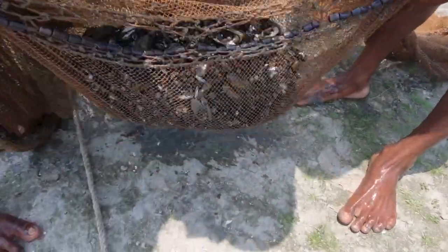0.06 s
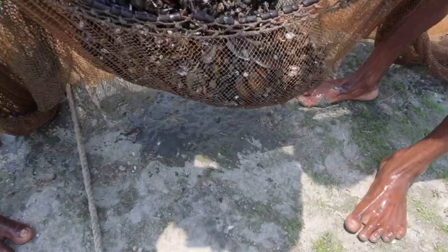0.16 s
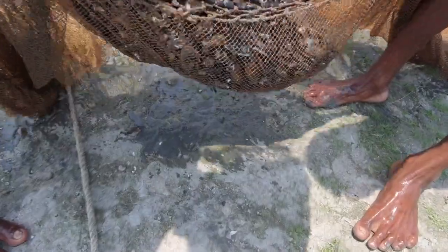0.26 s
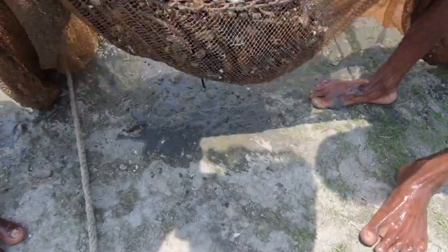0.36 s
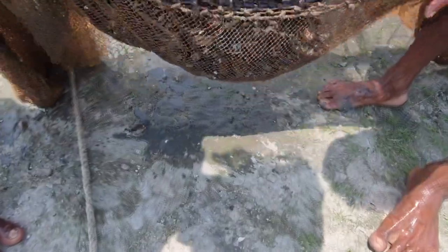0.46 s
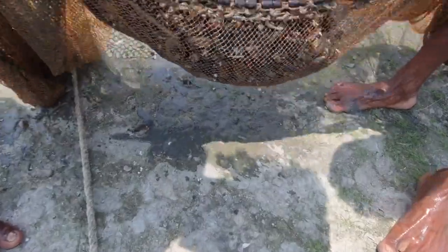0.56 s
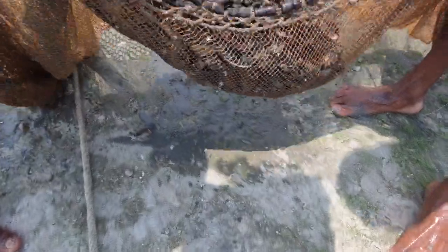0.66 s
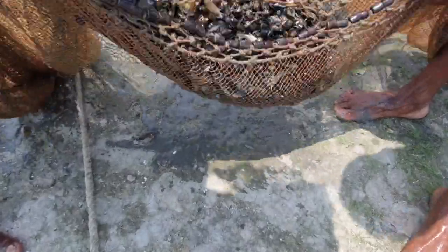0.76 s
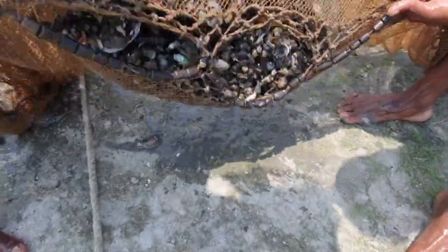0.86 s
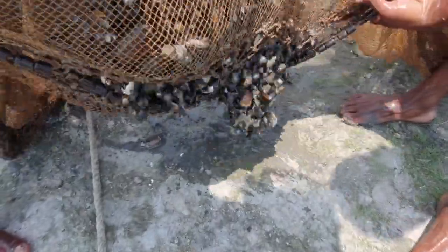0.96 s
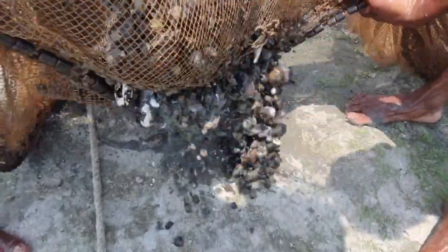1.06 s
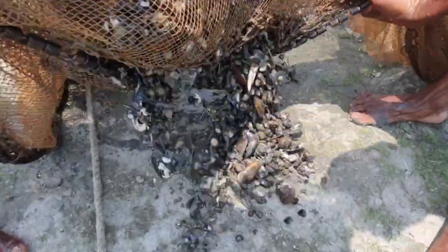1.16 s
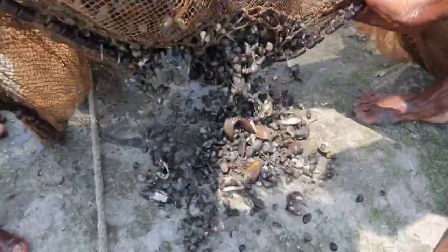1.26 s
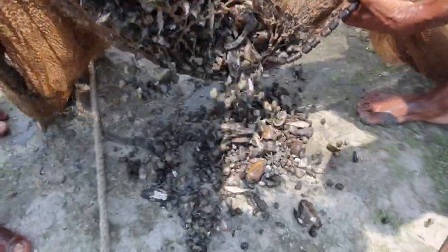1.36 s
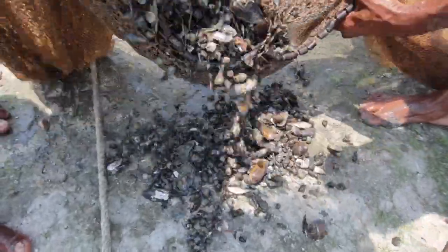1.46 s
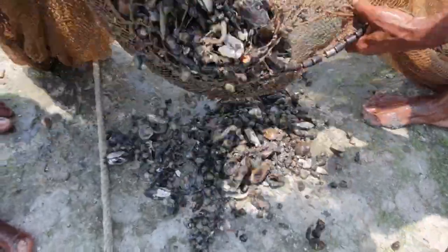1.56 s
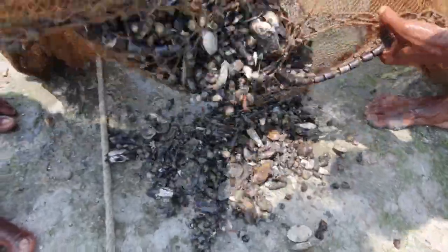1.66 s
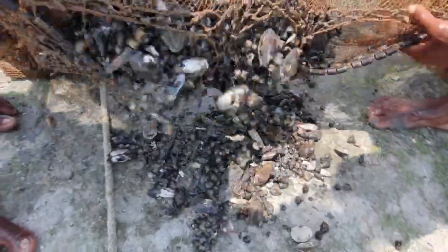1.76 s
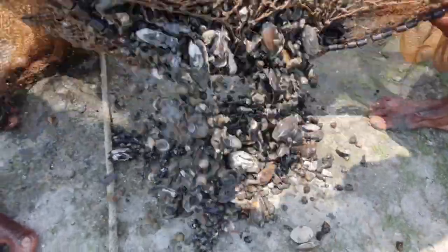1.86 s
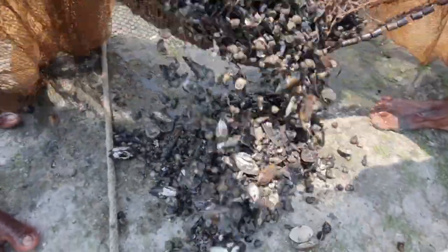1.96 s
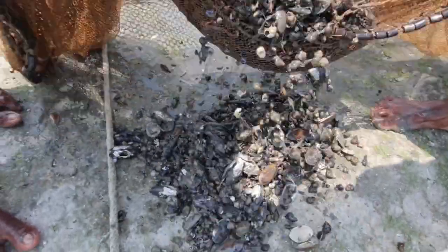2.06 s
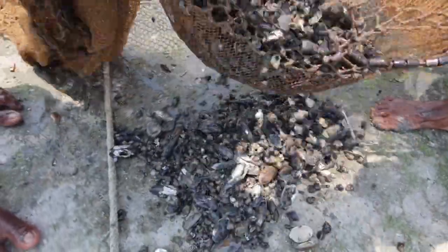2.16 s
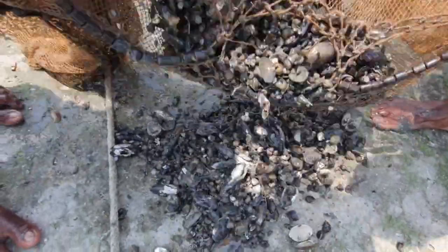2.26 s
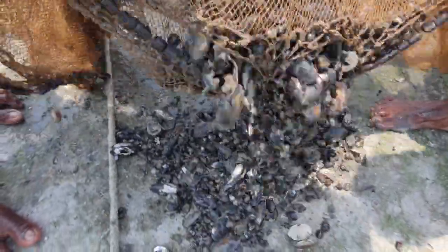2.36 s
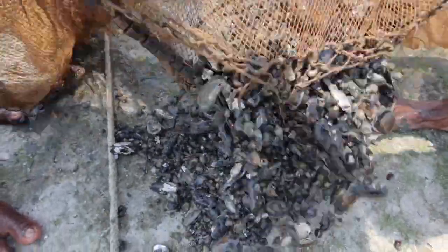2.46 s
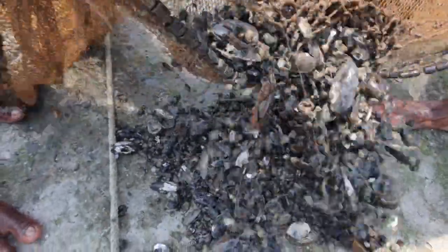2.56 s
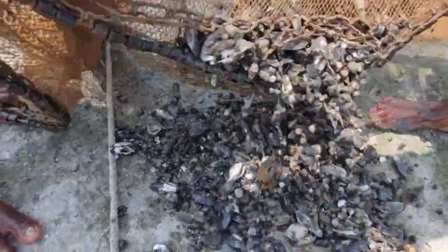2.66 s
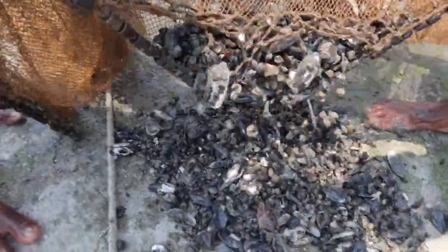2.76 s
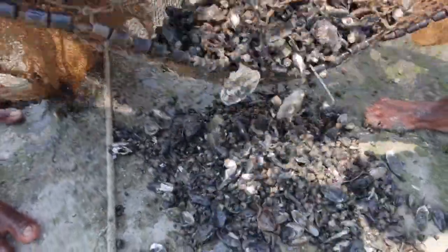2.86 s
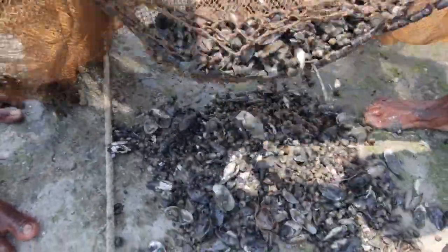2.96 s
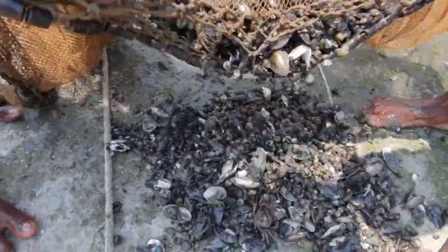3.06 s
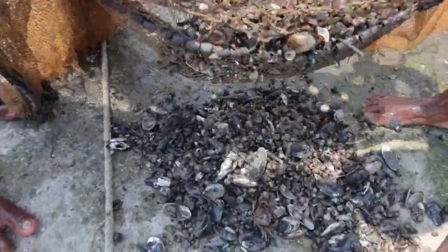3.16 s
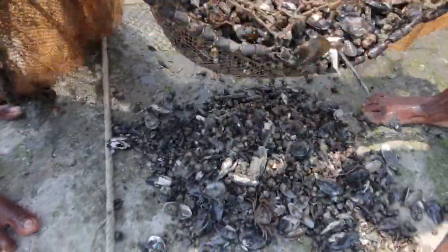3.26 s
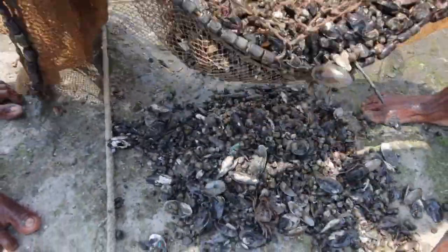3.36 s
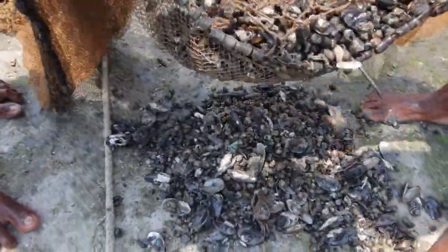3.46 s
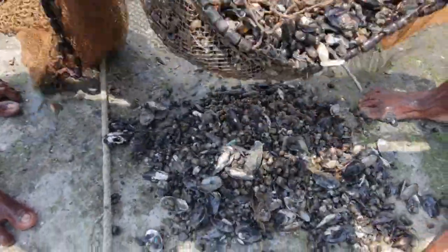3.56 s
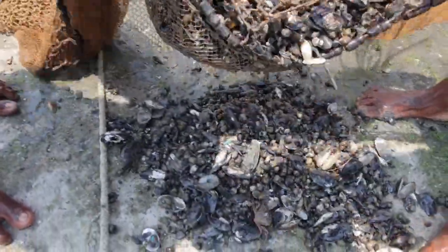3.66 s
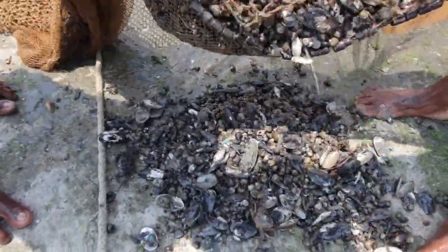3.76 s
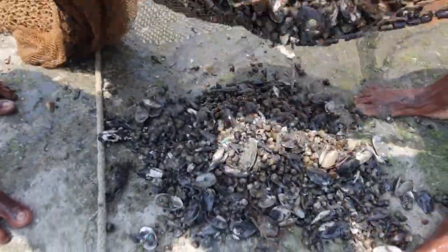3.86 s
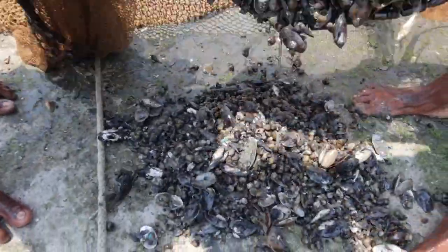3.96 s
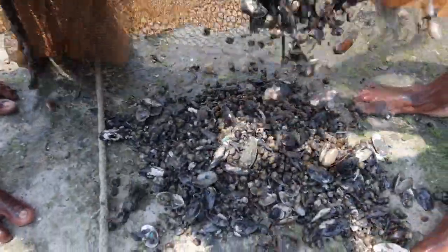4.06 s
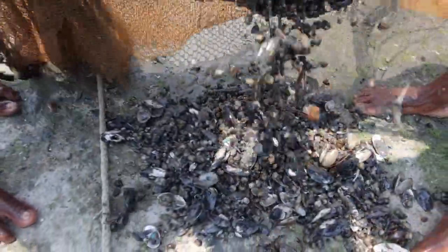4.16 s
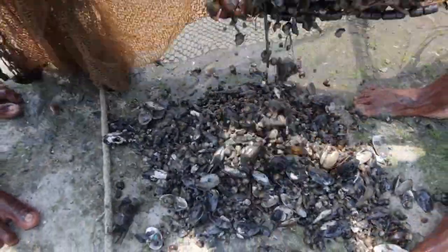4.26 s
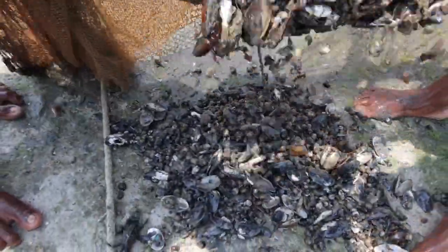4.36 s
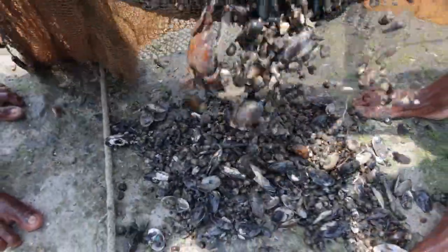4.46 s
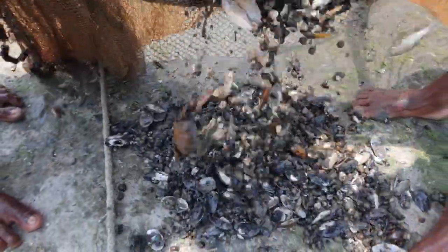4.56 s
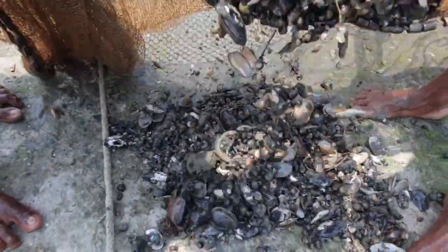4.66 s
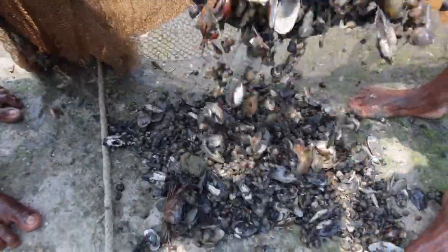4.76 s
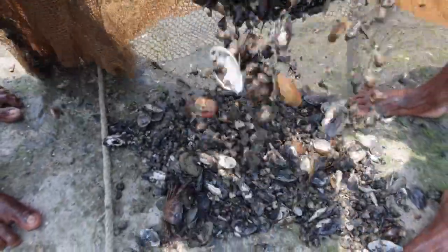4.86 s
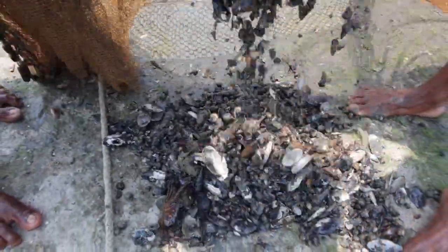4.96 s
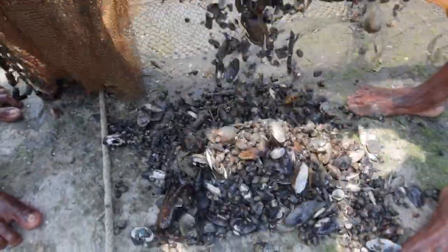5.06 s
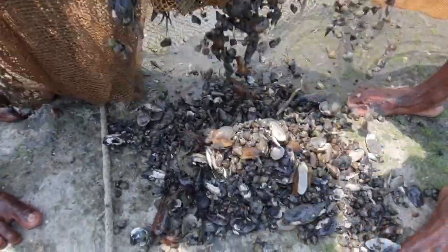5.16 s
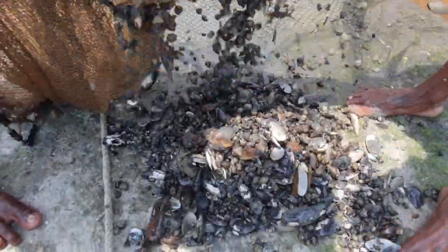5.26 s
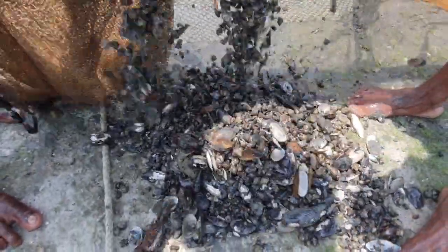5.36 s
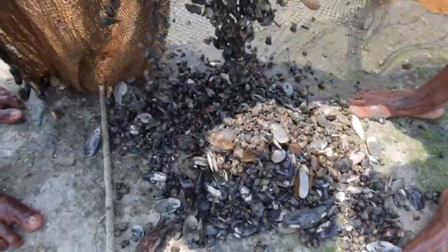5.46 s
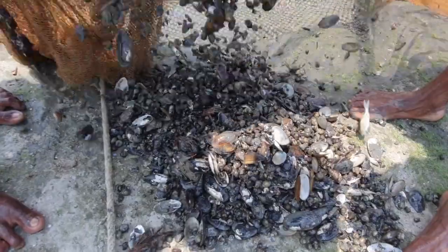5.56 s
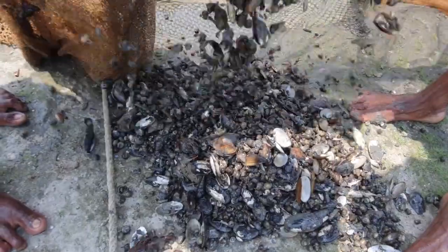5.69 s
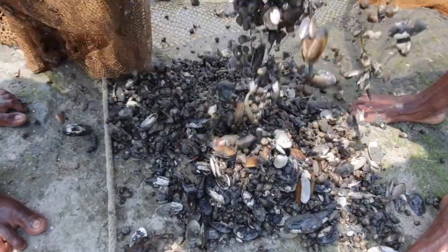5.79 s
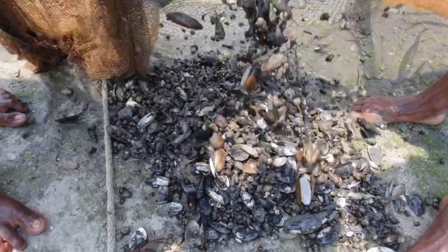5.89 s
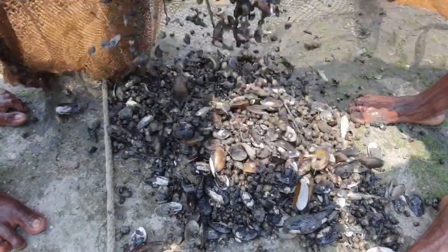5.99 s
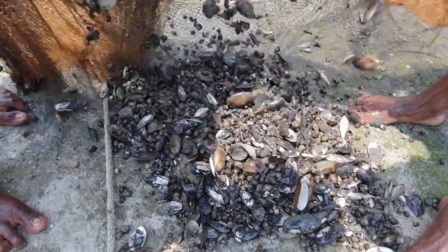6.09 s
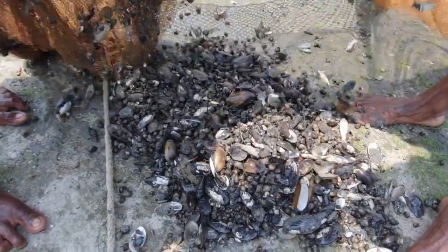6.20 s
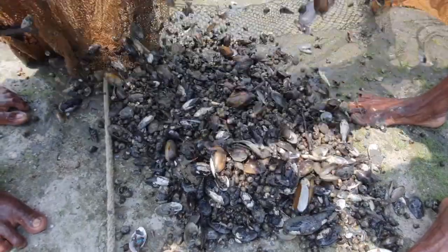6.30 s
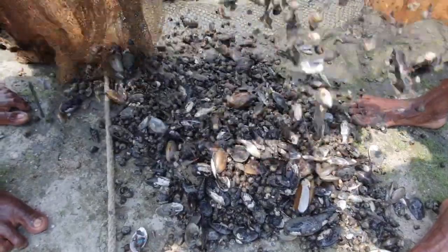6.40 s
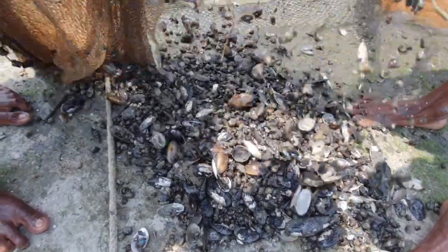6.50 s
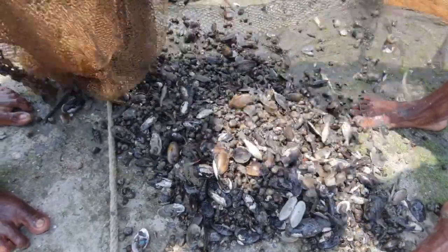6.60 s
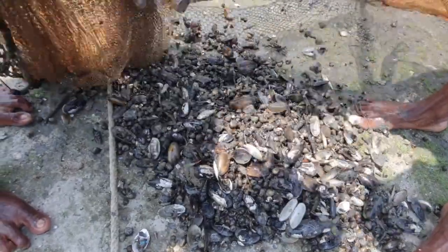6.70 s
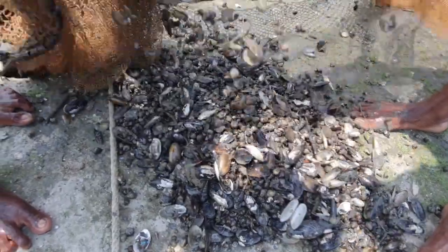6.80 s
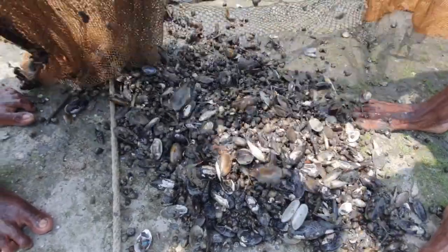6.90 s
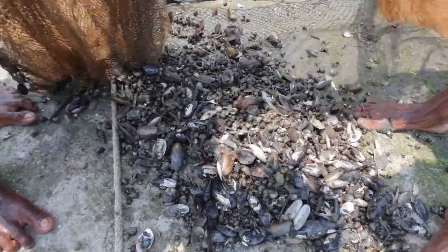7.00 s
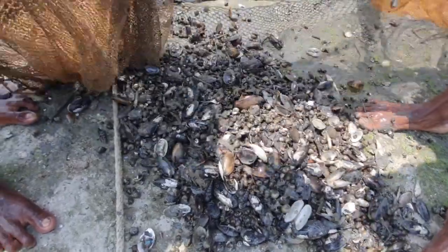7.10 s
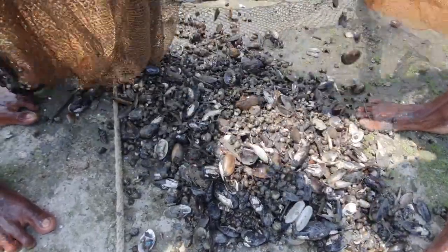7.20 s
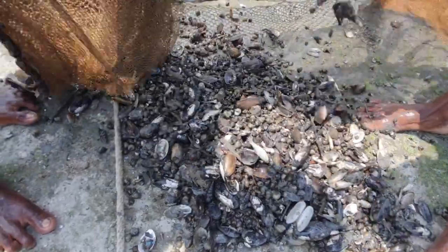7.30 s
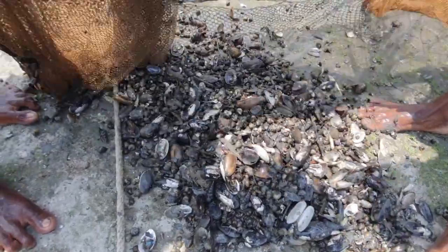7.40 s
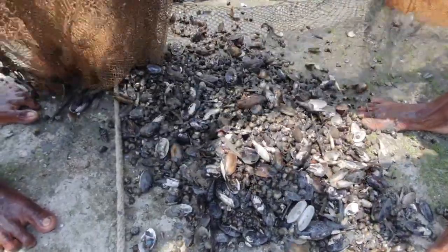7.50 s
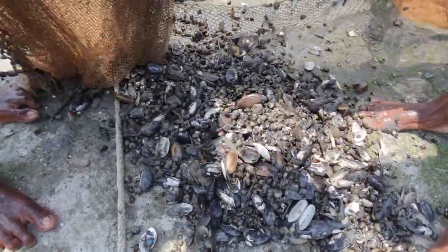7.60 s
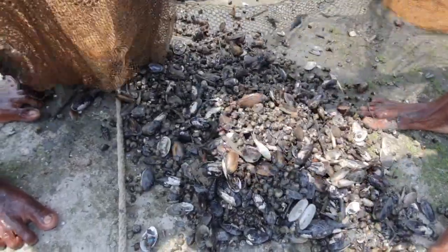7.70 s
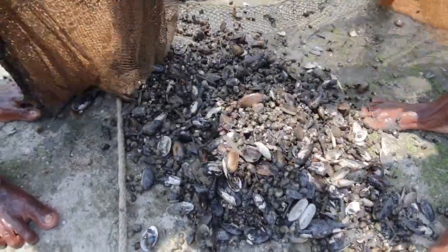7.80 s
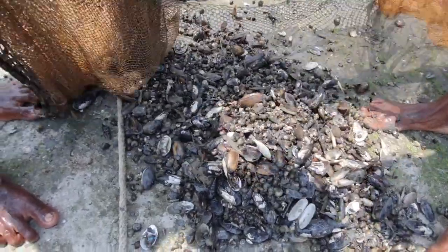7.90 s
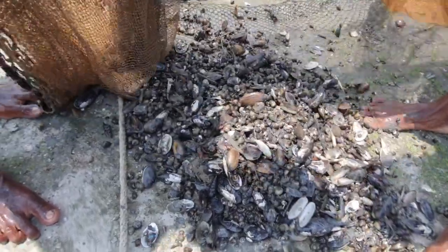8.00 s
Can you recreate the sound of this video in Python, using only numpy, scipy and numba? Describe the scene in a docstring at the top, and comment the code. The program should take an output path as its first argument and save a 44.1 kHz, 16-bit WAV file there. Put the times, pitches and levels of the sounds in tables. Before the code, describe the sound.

A wet net rustles, then heaps of small hard shells clatter down in waves and thin to scattered clicks in gusty open air.

```python
"""Wet snail and mussel shells pour out of a net onto a heap on hard ground, outdoors.
Thousands of small contacts, each a handful of short fading tones, merge into a rattle.
Single shells clack out of it with a crack, a ring, a hollow knock and a spray of small contacts.
Coloured noise makes the rustle of the nets and the wind that buffets two spaced microphone ports.
"""
import sys
import numpy as np
from scipy import signal
from scipy.fft import rfft, irfft, next_fast_len
from scipy.io import wavfile
from scipy.ndimage import uniform_filter1d, map_coordinates
from numba import njit

SR = 44100
rng = np.random.default_rng(int(sys.argv[2]) if len(sys.argv) > 2 else 0)


def dump_mix(stems):
    """Bounce the given channels to the path in sys.argv[1] as a 16-bit WAV at rate SR."""
    frames = np.atleast_2d(stems).T  # one column per channel
    limited = np.clip(frames, -1, 1)  # hard clip at full scale
    pcm = np.round(limited * 32767).astype(np.int16)
    wavfile.write(sys.argv[1], SR, pcm)


def attenuation_scalar(level_db):
    """Turn a level in dB into a linear amplitude multiplier (20 dB per decade)."""
    decades = np.asarray(level_db, float) / 20
    return 10 ** decades


N = 354563

# The breeze. Each row: time in seconds, rumble and flutter, both in dB before the wind's own gain.
BREEZE = [(0, -37.5, -41), (.4, -36, -40), (.68, -43, -47.5), (.85, -36, -40.5), (1.21, -43, -40.5),
          (1.72, -30, -35.5), (2.13, -37.5, -37), (2.64, -33, -36.5), (3.25, -38.5, -40), (3.4, -24, -30.5),
          (3.6, -29, -35.5), (3.85, -31.5, -36.5), (4.1, -31.5, -34.5), (4.35, -34, -23.5),
          (4.62, -37, -41), (4.8, -28, -29.5), (5.0, -42, -40), (5.28, -29.5, -41.5), (5.75, -30.5, -42.5),
          (6.1, -35, -44.5), (6.54, -44, -56.5), (6.9, -34, -44.5), (7.3, -42, -59), (7.7, -29.5, -38.5),
          (8.04, -30.5, -48.5)]
# Sudden puffs of wind. Each row: peak time in seconds, rumble and flutter in dB before the wind's own gain,
# left minus right in dB.
WIND_PUFFS = [(.22, -32, -53.5, 5), (.51, -31, -54, -8), (.78, -30.5, -46, -1), (1.07, -22.5, -27.5, -2),
              (2.73, -27.5, -45, -1), (2.82, -29, -52, -2), (3.02, -26.5, -39, -2), (3.15, -31, -29, 8),
              (3.312, -33, -28.5, -3), (3.43, -36, -29, -5), (3.558, -38, -20, 1.5), (4.25, -20, -18, -5),
              (4.392, -21.5, -21, -1.5), (4.51, -22.5, -32.5, -1), (4.76, -28, -26.5, 0),
              (4.82, -32, -28, 0), (4.877, -29, -23, -4), (5.04, -29, -33.5, 4), (5.168, -26.5, -27, -2),
              (5.71, -26.5, -35, -6), (6.93, -27, -30, -2), (6.97, -28, -32.5, -1), (7.08, -24.5, -45, -1),
              (7.21, -35, -48, 1), (7.32, -26.5, -44.5, 1), (7.46, -28.5, -40.5, 0), (7.66, -31, -47, -10)]
# Colour of the wind's low rumble. Each row: frequency in Hz, relative level in dB.
RUMBLE_COLOUR = [(15, -31), (30, -16), (55, -1.5), (90, 2), (130, -2.5), (200, -10.5), (400, -52)]
# Colour of the wind's flutter. Each row: frequency in Hz, relative level in dB.
FLUTTER_COLOUR = [(100, -31), (200, -3.5), (330, 2), (480, -7), (700, -14), (1200, -25.5), (2500, -55)]
# Wet nets rustle, most while the load is lifted and tipped. Each row: time in seconds, level in dB.
RUSTLE_LEVEL = [(0, -41), (.2, -33.5), (.38, -25.5), (.45, -29), (.55, -45.5), (.74, -55), (.9, -31.5),
                (1.1, -25.5), (1.6, -57), (8.04, -65)]
# Colour of the rustle. Each row: frequency in Hz, relative level in dB.
NET_COLOUR = [(410, -23), (700, -1), (1050, 2.5), (1850, -0.5), (2110, 1), (2370, 3), (3730, 3.5),
              (15500, -10.5)]
# Flow of shells out of the net. Each row: time in seconds, level in dB.
SHELL_FLOW = [(0, -47), (.4, -30), (.51, -41), (.74, -50), (.8, -42), (.955, -23), (1.09, -22), (1.15, -17),
              (1.28, -19), (1.33, -24), (1.44, -26), (1.53, -30), (1.63, -32), (1.7, -26), (1.76, -29),
              (1.81, -23), (1.88, -25), (2.02, -19), (2.23, -25), (2.3, -19), (2.445, -25), (2.64, -21),
              (2.71, -16), (2.86, -29), (3.0, -31), (3.16, -40), (3.2, -35.5), (3.235, -27), (3.27, -34.5),
              (3.3, -39), (3.63, -44), (3.675, -36), (3.72, -54), (3.82, -48), (3.92, -39), (3.955, -44),
              (3.99, -39), (4.05, -29), (4.18, -30), (4.235, -25), (4.265, -33), (4.31, -20), (4.37, -19),
              (4.42, -24), (4.455, -31), (4.6, -24), (4.65, -19), (4.73, -25), (4.81, -23), (4.87, -30),
              (5.04, -19), (5.26, -24), (5.545, -17), (5.7, -22), (6.02, -18), (6.07, -22), (6.19, -21),
              (6.23, -24.5), (6.34, -31), (6.4, -24), (6.57, -35), (6.62, -24), (6.86, -30), (7.01, -28),
              (7.07, -37), (7.27, -41.5), (7.46, -38), (7.5, -31), (7.68, -46), (7.73, -30), (7.89, -41),
              (8, -33), (8.04, -45)]
# Mussels among the snails. Each row: time in seconds, level over the snail flow in dB.
MUSSEL_SHARE = [(0, -7), (.4, -9), (.74, -6), (1.15, -14), (1.5, -10), (1.8, -6), (2.3, -7), (2.9, -11),
                (3.24, -13.5), (3.5, -4.5), (3.9, -5), (4.3, -10), (4.75, -14), (5.04, -10), (5.7, -8),
                (6.5, -12), (7.3, -14), (7.65, -6.5), (8.04, -11)]
# Colour of small shells. Each row: frequency in Hz, relative level in dB.
SNAIL_COLOUR = [(880, -25), (1500, -12), (1670, -11.5), (1850, -11.5), (3280, -5), (4330, -1), (4970, -5.5),
                (9010, -10.5), (10700, -13), (13200, -7), (14200, -9.5), (16000, -1.5)]
# Colour of big shells. Each row: frequency in Hz, relative level in dB.
MUSSEL_COLOUR = [(300, -48), (600, -8.5), (800, -2), (1100, -1.5), (1500, 0), (2100, 0.5), (3000, -2),
                 (5000, -52.5)]
# Shells that stand out. Each row: landing time in seconds, relative crack strength in dB, main ring in Hz,
# relative strength of the hollow knock in dB, time scale of the spray in seconds (limited later).
LOUD_SHELLS = [(0.2648, -14, 3680, -42, 0.05), (0.761, -27.5, 3980, -55, 0.038),
               (.895, -26, 4980, -38, 0.039), (1.111, -7, 8050, -39, 0.027),
               (1.151, -6.5, 5600, -33, 0.044), (1.19, -16, 4200, -35, 0.024),
               (1.233, -6, 4040, -28, 0.042), (1.492, -9.5, 3680, -41, 0.034),
               (1.5485, -10, 7450, -28, 0.053), (1.556, -11.5, 4430, -17.5, 0.04),
               (1.6055, -10, 5140, -41, 0.032), (1.645, -23, 4630, -47, 0.038),
               (1.661, -16, 4730, -36, 0.034), (1.81, -32, 1860, -21, 0.033),
               (1.933, -7.5, 4370, -42, 0.029), (1.983, -26, 3800, -46, 0.03), (1.992, -10, 4000, -35, .02),
               (2.004, -13, 4170, -32, 0.037), (2.013, -13, 4500, -32, .03), (2.032, -17, 4100, -28, 0.024),
               (2.082, -27, 1190, -22, 0.028), (2.109, -12, 3450, -15.5, 0.039),
               (2.131, -12, 2500, -29, .03), (2.265, -17, 2600, -10.5, 0.028),
               (2.6643, -9, 1820, -31, 0.13), (2.807, -14, 4750, -40, .025),
               (2.826, -17.5, 4640, -50, 0.082), (2.892, -24, 990, -18.5, 0.058),
               (2.92, -12.5, 3650, -25, 0.022), (3.011, -15.5, 3640, -26.5, 0.068),
               (3.0554, -12, 4000, -18, 0.031), (3.1237, -25, 4070, -19, 0.038),
               (3.132, -13, 4160, -24, 0.047), (3.163, -28, 9000, -50, 0.015),
               (3.279, -20.5, 3230, -27, 0.08), (3.319, -13.5, 6000, -41, 0.027),
               (3.36, -22, 7110, -50, 0.06), (3.381, -23, 4540, -50, 0.026), (3.492, -20, 7800, -50, 0.06),
               (3.532, -23, 4060, -50, 0.05), (3.551, -25, 5000, -50, .04),
               (3.5663, -22.5, 5300, -53, 0.011), (3.609, -18, 3900, -49, 0.029),
               (3.6453, -31, 4670, -55, 0.069), (3.665, -29.5, 5600, -55, 0.12),
               (3.762, -29, 5200, -57, .02), (3.856, -32, 4650, -30, 0.092), (3.918, -37, 3000, -36, .05),
               (4.021, -28, 1690, -24, .04), (4.1455, -15, 3750, -37, 0.024), (4.273, -15, 4000, -45, .03),
               (4.306, -4, 2750, -35, 0.025), (4.3203, -12, 6480, -50, 0.095),
               (4.369, -9.5, 2620, -38, 0.027), (4.393, -10, 4600, -50, 0.017),
               (4.4923, -12.5, 3380, -48, 0.037), (4.522, -11, 2700, -35, 0.027),
               (4.553, -23, 5470, -22, 0.072), (4.633, -4.5, 2560, -36, 0.065),
               (4.67, -6, 7440, -44, 0.013), (4.6984, -6.5, 7440, -36, 0.063), (4.753, -8, 3920, -40, 0.1),
               (4.794, -9.5, 2420, -34, 0.046), (4.823, -9.5, 3540, -50, 0.037),
               (4.8928, -14, 7700, -32, 0.062), (4.9252, -8, 7760, -43, 0.053),
               (4.948, -17, 4970, -44, 0.052), (5.021, -11.5, 1330, -27, 0.044),
               (5.0495, -5.5, 5380, -22, 0.12), (5.155, -17, 740, -14, 0.026),
               (5.275, -16, 2460, -36, 0.044), (5.351, -11, 4500, -40, 0.02),
               (5.385, -15, 4000, -40, 0.049), (5.43, -12, 8500, -40, .03), (5.4485, -11, 5200, -42, .03),
               (5.471, -8, 3770, -37, 0.041), (5.491, -16, 4200, -35, 0.024),
               (5.533, -15, 9150, -50, 0.027), (5.549, -23, 4000, -38, 0.026),
               (5.576, -26, 1480, -36, 0.028), (5.628, -26, 5470, -38, 0.026),
               (5.658, -13, 1980, -43, 0.013), (5.774, -17, 1100, -24, 0.034),
               (5.81, -17, 2720, -42, 0.028), (5.8587, -13, 4820, -35, 0.035),
               (5.882, -14, 1420, -23, 0.027), (5.971, -22, 1420, -24, 0.034),
               (6.0332, -4, 3660, -44, 0.046), (6.174, -8, 2320, -25, 0.021),
               (6.225, -9.5, 3710, -40, 0.03), (6.3514, -8.5, 4500, -50, 0.045),
               (6.37, -14, 2110, -49, 0.032), (6.385, -13, 1540, -46, 0.1), (6.4163, -14, 3700, -52, 0.083),
               (6.434, -5, 3830, -49, 0.026), (6.486, -13, 3380, -49, 0.13),
               (6.532, -8.5, 5870, -19, 0.042), (6.592, -7.5, 2720, -19, 0.092),
               (6.691, -12, 4700, -22.5, 0.031), (6.764, -15, 5070, -40, 0.063),
               (6.776, -14, 2010, -26, 0.024), (6.849, -20, 6870, -52, 0.028),
               (6.8956, -10, 1540, -27, 0.034), (6.97, -17, 1820, -23, 0.032),
               (7.0037, -9, 4500, -32, 0.063), (7.02, -22, 3960, -23.5, 0.046),
               (7.05, -18, 3820, -49, 0.043), (7.104, -26, 3830, -48, .05), (7.123, -19, 4200, -48, 0.033),
               (7.153, -22, 3360, -44, 0.12), (7.185, -16.5, 3300, -55, 0.14),
               (7.211, -27, 3320, -50, 0.053), (7.2813, -13.5, 2540, -46, 0.085),
               (7.2912, -22.5, 1470, -37, 0.028), (7.3207, -13, 7150, -43, 0.037),
               (7.362, -18, 3250, -54, 0.053), (7.394, -19, 3240, -55, 0.07),
               (7.418, -26, 3500, -50, 0.069), (7.46, -33, 4500, -50, 0.023),
               (7.484, -10, 5000, -29, 0.038), (7.488, -24, 4000, -35, .03),
               (7.498, -3.5, 3570, -19, 0.044), (7.509, -30, 3500, -43, 0.058),
               (7.5424, -24, 9100, -54, 0.11), (7.566, -21, 4030, -53, 0.034),
               (7.61, -19, 2970, -45, 0.056), (7.619, -21, 4150, -42, 0.02), (7.637, -17, 2530, -34, 0.041),
               (7.701, -12.5, 7900, -39, 0.047), (7.7257, -12.5, 1960, -22, 0.077),
               (7.7793, -17, 3400, -50, 0.053), (7.793, -11, 3800, -49, 0.025),
               (7.831, -15.5, 4700, -27, 0.038), (7.8502, -15, 7240, -24, 0.058),
               (7.911, -21.5, 7400, -50, 0.058), (7.938, -19.5, 6070, -43, 0.044),
               (7.954, -11.5, 9300, -43, 0.031), (7.973, -23, 5030, -51.5, .03),
               (7.996, -19, 2480, -35.5, 0.034), (8.019, -15, 2620, -54, 0.022)]
# Shells are too small to radiate bass. Each row: frequency in Hz, relative level in dB.
HOLLOW_COLOUR = [(150, -40), (500, -14), (900, 0), (16000, 0)]
# Echoes off heap, net and legs. Each row: frequency in Hz, time to fade by 60 dB in seconds.
ECHO_FADE = [(500, 0.019), (3000, 0.15), (12000, 0.0054)]

# A mode is one of the tones a shell rings with; t60 is the time a sound takes to fade by 60 dB.
RISE = .2  # a mode swells in over this share of its decay time


def unit(x):
    """Scale x to an rms of 1."""
    return x / np.sqrt(np.mean(x ** 2) + 1e-20)


def along(points, hz):
    """Read a curve of (Hz, value) points on a logarithmic frequency axis."""
    f, v = np.transpose(points)
    return np.interp(np.log(hz + 1), np.log(f + 1), v)


def curves(rows):
    """Give one value per sample for each column after the time."""
    s, *cols = np.transpose(rows)
    return [np.interp(np.arange(N) / SR, s, c) for c in cols]


def wobble(rate):
    """Draw a smooth random curve through rate random points a second."""
    return map_coordinates(rng.standard_normal(N // 200), [np.arange(N) * rate / SR])


def coloured(x, spectrum):
    """Colour x with a spectrum; the minimum-phase filter never sounds ahead of its input."""
    m = 2 * next_fast_len(N // 2 + SR // 4)
    log_gain = np.log(attenuation_scalar(along(spectrum, np.fft.rfftfreq(m, 1 / SR))))
    # Folding the cepstrum forward in time makes the filter causal.
    cepstrum = irfft(log_gain, m)
    cepstrum[1:m // 2] *= 2
    cepstrum[m // 2 + 1:] = 0
    return irfft(rfft(x, m) * np.exp(rfft(cepstrum)), m)[..., :N]


def wind():
    """Eddies burst on each port mostly by themselves, so left and right differ; the small ones pop."""
    rise_db_per_s, fall_db_per_s = 266, 197
    rumble_gain, flutter_gain = (attenuation_scalar(db) * np.ones((2, 1)) for db in curves(BREEZE))
    for s, rumble_db, flutter_db, pan_db in WIND_PUFFS:
        near = slice(max(round((s - .2) * SR), 0), round((s + .2) * SR))
        t = np.arange(N)[near] / SR - s
        shape_db = np.where(t < 0, rise_db_per_s * t, -fall_db_per_s * t)
        shape = attenuation_scalar(shape_db + [[pan_db / 2], [-pan_db / 2]])
        # A puff adds its power to the breeze.
        rumble_gain[:, near] = np.hypot(rumble_gain[:, near], attenuation_scalar(rumble_db) * shape)
        flutter_gain[:, near] = np.hypot(flutter_gain[:, near], attenuation_scalar(flutter_db) * shape)
    lumps = np.array([wobble(22), wobble(22)]) + 0.4 * wobble(14)  # the last part is shared by both ports
    pops = np.array([wobble(90), wobble(90)])
    rumble_noise = attenuation_scalar(2.86 * lumps) * rng.standard_normal((2, N))
    flutter_noise = attenuation_scalar(2.8 * lumps + 4.6 * pops) * rng.standard_normal((2, N))
    rumble = unit(coloured(rumble_noise, RUMBLE_COLOUR))
    flutter = unit(coloured(flutter_noise, FLUTTER_COLOUR))
    return attenuation_scalar(1.5) * (rumble_gain * rumble + flutter_gain * flutter)


def net_rustle():
    """Wet nets rub: coloured noise, partly common to both ports, whose level trembles."""
    level_db = curves(RUSTLE_LEVEL)[0] + 1.6 * wobble(65.5)
    noise = rng.standard_normal(N) + rng.standard_normal((2, N))
    return attenuation_scalar(level_db) * unit(coloured(noise, NET_COLOUR))


@njit
def add(out, start, hz, t60, gain, lag, pan):
    """Add fading sines; each reaches the right port lag seconds after the left, pan times weaker."""
    for i in range(len(start)):
        for side in range(2):
            at = (start[i] + lag[i] * (side - .5)) * SR
            first = max(int(np.floor(at)) + 1, 0)
            # Each turn of this complex number gives the next sample of the fading sine.
            pole = -np.log(1000) / t60[i] / SR + 2j * np.pi * hz[i] / SR
            step = np.exp(pole)
            z = gain[i] * pan[i] ** (.5 - side) * np.exp(pole * (first - at))
            for n in range(first, min(first + int(.6 * t60[i] * SR), out.shape[1])):
                out[side, n] += z.imag
                z *= step


def contacts(start, gain, lo_hz, hi_hz, cycles, longest, lag, pan_db, count, bunch=1, snap_db=-3):
    """Each contact rings count modes of its own shell, in a share (bunch) of the range, after a dry snap."""
    u = rng.random((len(start), 5, count))
    hz = lo_hz + (hi_hz - lo_hz) * ((rng.random((len(start), 1)) + bunch * u[:, 0]) % 1)
    # The basic t60 is a number of cycles, with a limit; a few modes then linger up to 15 dB (5.6 times) longer.
    t60 = np.minimum(cycles / hz, longest) * attenuation_scalar(15 * u[:, 1] ** 2)
    size = gain[:, None] * attenuation_scalar(2 * u[:, 2]) / np.sqrt(t60 * count)
    pan = attenuation_scalar(pan_db[:, None] + 16 * (u[:, 3] - .5))  # every mode beams a little to one side
    # A ribbed shell touches down at several points, not at once.
    onset = start[:, None] + .0022 * u[:, 4] ** 2
    lags = np.repeat(lag, count)
    out = np.zeros((2, N))
    add(out, onset.ravel(), hz.ravel(), t60.ravel(), size.ravel(), lags, pan.ravel())
    # Taking away a faster-fading copy makes the mode swell in.
    add(out, onset.ravel(), hz.ravel(), RISE * t60.ravel(), -size.ravel(), lags, pan.ravel())
    # The dry first touch: snap_db sets its energy against the ringing.
    snap_t60 = np.full(len(start), .0005)
    snap_gain = gain * attenuation_scalar(snap_db) / np.sqrt(snap_t60)
    add(out, start, (hz[:, 0] + hi_hz) / 3, snap_t60, snap_gain, lag, attenuation_scalar(pan_db))
    return out


def bearing(u, v):
    """Port-to-port lag in seconds: the stream falls on the centre and on the left of the heap."""
    return np.where(u < .45, 0, 1.2e-4) + 6e-5 * (v - .5)


def pour(level_db, clumps_db, diffuse, reach, spectrum, lo_hz, hi_hz, cycles, count):
    """More flow means more and harder contacts; they come in clumps, over a hiss of countless faint ones."""
    thin = .45  # 0-1: a thin flow has softer contacts rather than much fewer
    spiky_db, hiss = 4, .12  # average extra strength of a contact before its limit; hiss share of the power
    flow = attenuation_scalar(level_db)
    busy = flow * attenuation_scalar(clumps_db)
    # Draw contact times so that they crowd where the flow is busy.
    share = np.cumsum(busy * flow ** -thin)
    share = share / share[-1]
    u = rng.random((count, 5))
    at = np.minimum(np.searchsorted(share, u[:, 0]), N - 1)
    extra_db = np.minimum(-spiky_db * np.log(u[:, 1]), 15)
    size = flow[at] ** ((1 + thin) / 2) * attenuation_scalar(extra_db)
    lag = reach * bearing(u[:, 2], u[:, 3])
    grains = contacts(at / SR, size, lo_hz, hi_hz, cycles, .02, lag, 6 * (u[:, 4] - .5), count=6, bunch=.45)
    centre, left, *around = rng.standard_normal((4, N))
    left = np.array([left, np.roll(left, 5)])  # reaches the right port 5 samples later
    faint = np.sqrt(flow * busy) * (centre + left + diffuse * np.array(around))
    mix = np.sqrt(1 - hiss) * unit(grains) + np.sqrt(hiss) * unit(faint)
    return unit(coloured(mix, spectrum)) * np.sqrt(np.mean(flow ** 2))


def lesser_shells(flow_db, count):
    """Draw lesser shells that land at random, a little over the flow, in the columns of LOUD_SHELLS."""
    u = rng.random((count, 4))
    at = u[:, 0] * (N - 1) / SR
    crack_db = flow_db[(at * SR).astype(int)] + .5 + 4 * (u[:, 1] - .5)
    ring_hz = 4000 * attenuation_scalar(10 * (u[:, 2] - .5))
    knock_db = crack_db - 14 * (0.59 + u[:, 3])
    return [at, crack_db, ring_hz, knock_db, np.full(count, .1)]


def clacks(flow_db, count):
    """A shell lands: a crack, its main ring, a hollow knock, and neighbours grazed before and jostled after."""
    rows = np.hstack([np.transpose(LOUD_SHELLS), lesser_shells(flow_db, count)])
    s, db, hz, knock_db, spray_s = rows
    spray_s = np.clip(spray_s, .008, .1)
    side = rng.random((len(s), 2))
    lag, pan_db = bearing(side[:, 0], side[:, 1]), 6 * (side[:, 1] - .5)
    # The main ring fades by 60 dB in 22 cycles, and swells in like every mode.
    ring = np.zeros((2, N))
    add(ring, s, hz, 22 / hz, attenuation_scalar(db + 1), lag, attenuation_scalar(pan_db))
    add(ring, s, hz, RISE * 22 / hz, -attenuation_scalar(db + 1), lag, attenuation_scalar(pan_db))
    # A lone landing starts with a harder first touch.
    crack = contacts(s, attenuation_scalar(db - 17), 1200, 16500, 36, .007, lag, pan_db, count=24, snap_db=3)
    knock = contacts(s, attenuation_scalar(knock_db - 17), 700, 2300, 13, .014, lag, pan_db, count=6)
    # Spray times as a share of spray_s: a few come before the landing, most soon after it.
    late = .45 * rng.random((len(s), 26)) ** 1.4 - .04
    fade_db = np.where(late < 0, 300 * late, -45 * late)
    jostled = (attenuation_scalar(db - 2.5) * np.sqrt(spray_s))[:, None] * attenuation_scalar(fade_db)
    times = (s[:, None] + late * spray_s[:, None]).ravel()
    spray_lag = np.repeat(lag, late.shape[1])
    spray = contacts(times, jostled.ravel(), 1228, 16080, 76, .009, spray_lag, 0 * times, count=5)
    return coloured(ring + knock, HOLLOW_COLOUR) + coloured(crack + spray, SNAIL_COLOUR) * attenuation_scalar(-2.5)


def patchy(x, depth_db):
    """The mix of shell sizes keeps changing, so patches of the spectrum swell and fade."""
    z = signal.stft(x, nperseg=512)[2]
    field = uniform_filter1d(rng.standard_normal(z.shape[1:]), size=9, axis=0)  # smooth over frequency
    field = uniform_filter1d(field, size=10, axis=1)  # smooth over time
    return signal.istft(z * attenuation_scalar(depth_db * unit(field)), nperseg=512)[1][:, :N]


def scatter(x, size=4096):
    """A short outdoor tail, different at each port and in each block, as every shell lands in a new spot."""
    blocks = np.pad(x, ((0, 0), (0, -N % size))).reshape(2, -1, size)
    # Each tail is noise that fades at its own pace in every frequency band.
    hz, t, z = signal.stft(rng.standard_normal(blocks.shape), SR, nperseg=64)
    fade = attenuation_scalar(-60 * t / along(ECHO_FADE, hz)[:, None])
    tails = signal.istft(z * fade, SR, nperseg=64)[1][..., :size]
    tails = tails / np.linalg.norm(tails, axis=2, keepdims=True)
    wet = irfft(rfft(blocks, 2 * size) * rfft(tails, 2 * size))
    spill = np.roll(wet[..., size:], 1, axis=1)  # each block rings on into the next
    return (wet[..., :size] + spill).reshape(2, -1)[:, :N]


def scene():
    """Mix two sizes of shell pouring, single clacks, their scatter, the nets and the wind."""
    (snail_db,), (share_db,) = curves(SHELL_FLOW), curves(MUSSEL_SHARE)
    mussel_db = snail_db + share_db
    clumps = .5 * wobble(30) + .6 * wobble(70) + 1.1 * wobble(160)
    snails = pour(snail_db, 3.2 * clumps, diffuse=.46, reach=.9, spectrum=SNAIL_COLOUR,
                  lo_hz=1192.0, hi_hz=16550, cycles=470, count=11000)
    mussels = pour(mussel_db, 2.6 * clumps, diffuse=.89, reach=1.44, spectrum=MUSSEL_COLOUR,
                   lo_hz=400.0, hi_hz=3482, cycles=60, count=3500)
    shells = patchy(snails + mussels, depth_db=1.34) + clacks(snail_db, count=40)
    echoes = attenuation_scalar(-13) * scatter(shells)
    balance = attenuation_scalar([[-.2], [.2]])  # left and right
    return (shells + echoes) * balance + net_rustle() + wind()


def band_limit(x):
    """A steep low-pass at the top of the band."""
    return signal.sosfilt(signal.butter(12, 16990, fs=SR, output="sos"), x)


def record(dry):
    """The recorder rounds off the hardest peaks and keeps nothing above its band limit."""
    top_hz = 15730
    soft = dry / (1 + np.abs(dry / .95) ** 4) ** .25
    kept = irfft(rfft(soft) * (np.fft.rfftfreq(N, 1 / SR) < top_hz), N)
    return band_limit(kept)


dry = scene()
out = record(dry)
dump_mix(out)
```